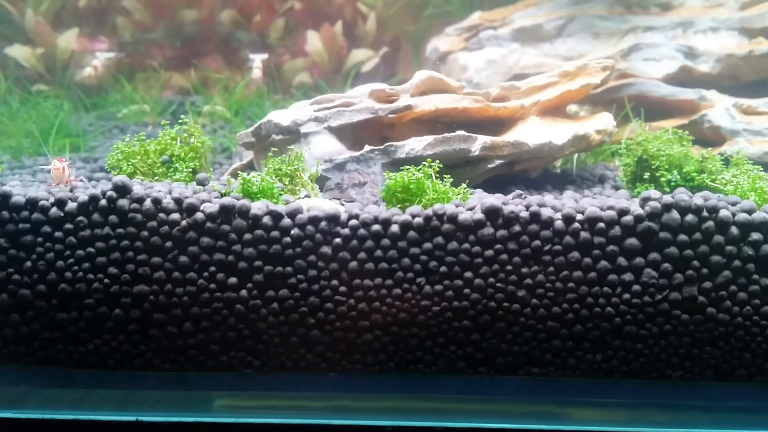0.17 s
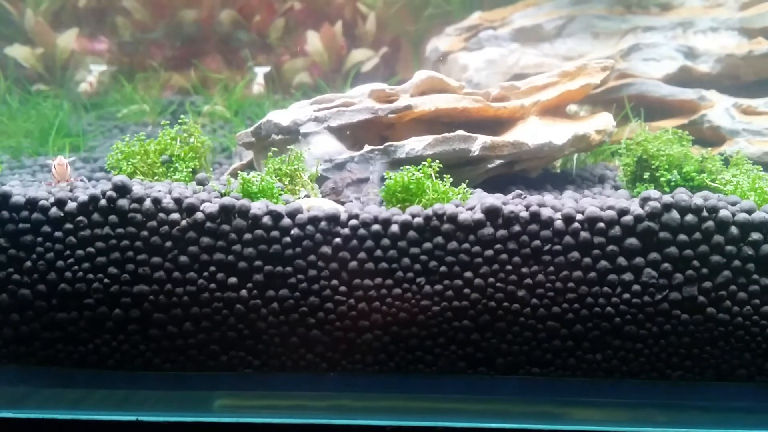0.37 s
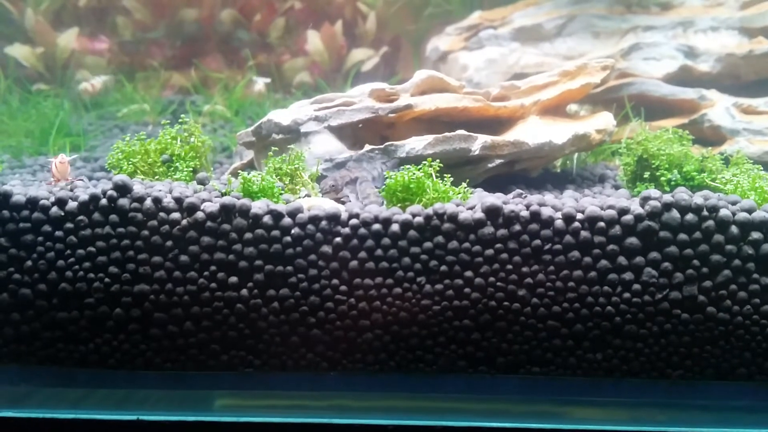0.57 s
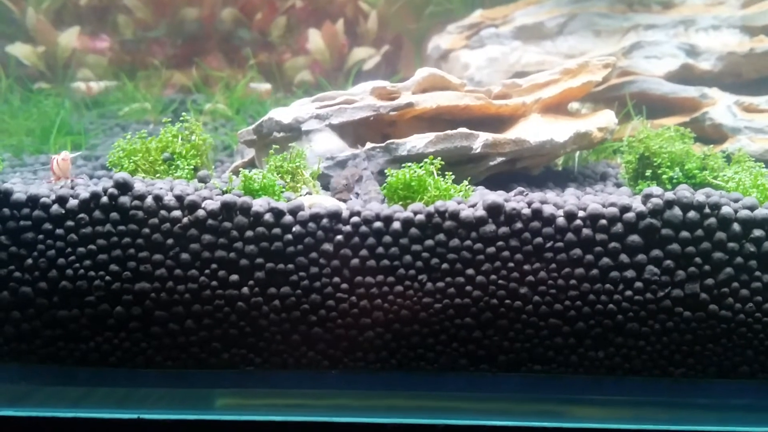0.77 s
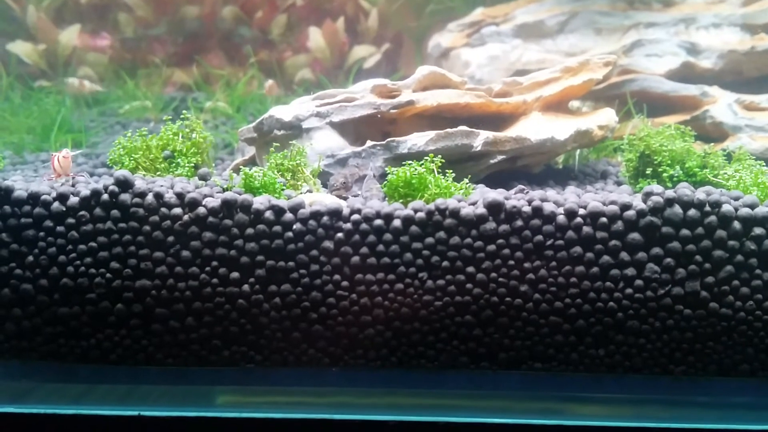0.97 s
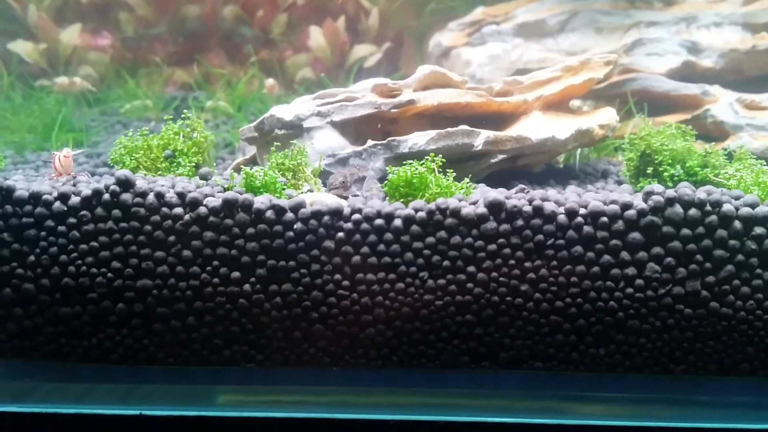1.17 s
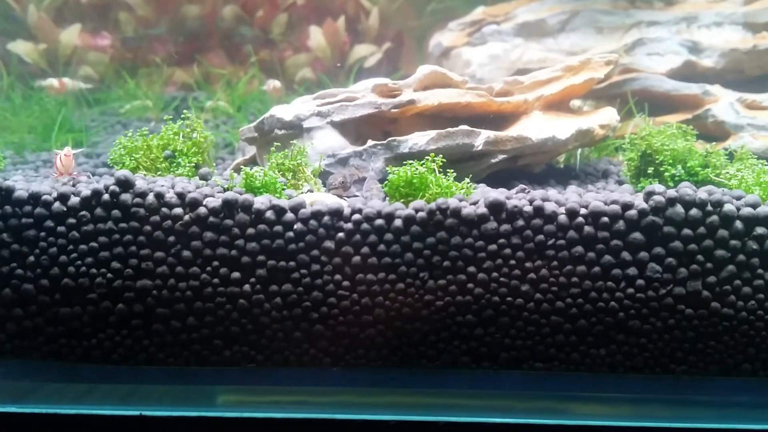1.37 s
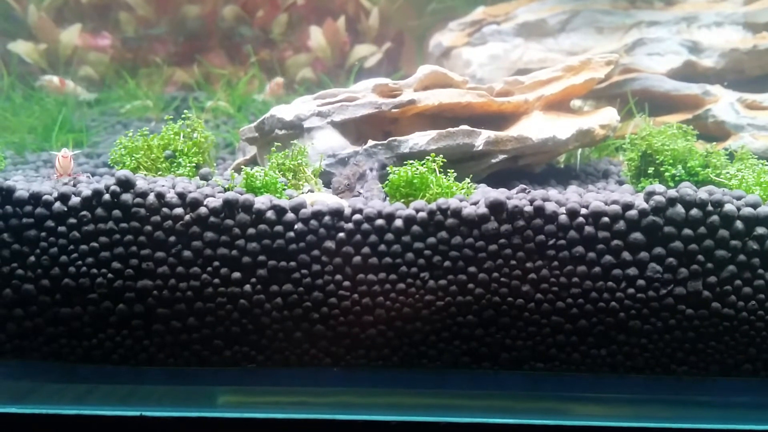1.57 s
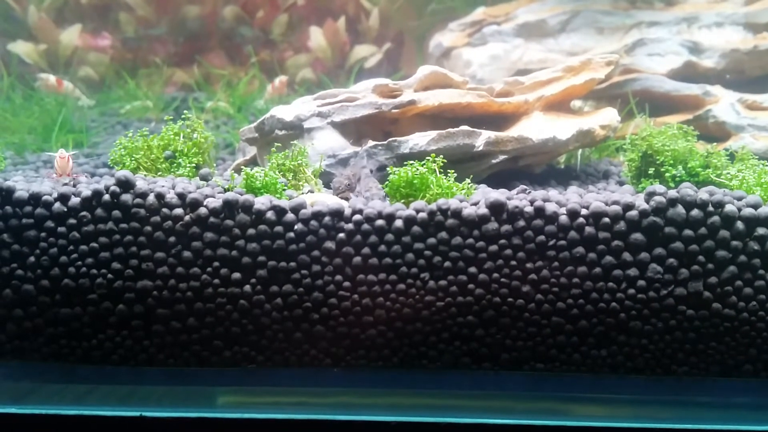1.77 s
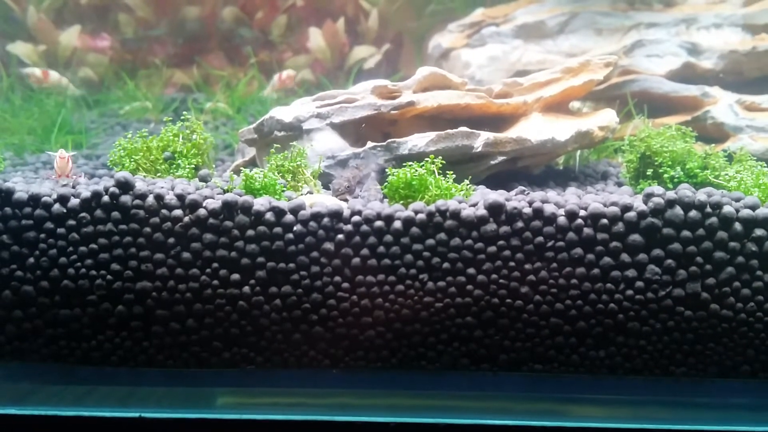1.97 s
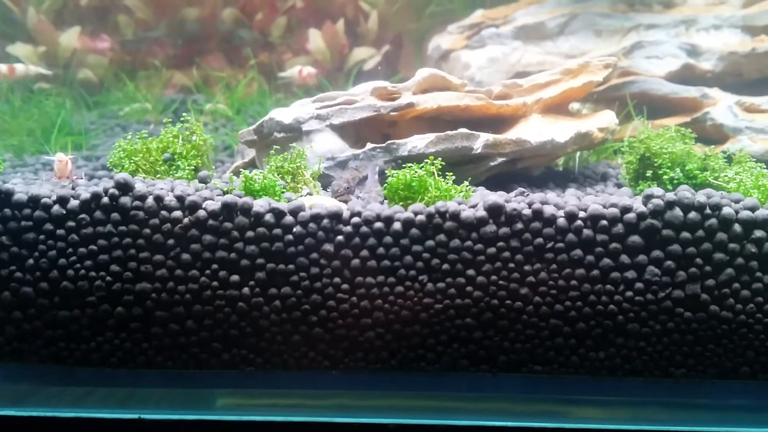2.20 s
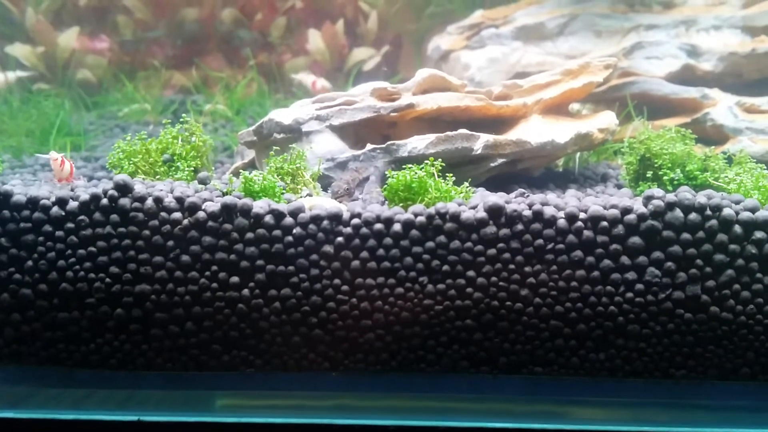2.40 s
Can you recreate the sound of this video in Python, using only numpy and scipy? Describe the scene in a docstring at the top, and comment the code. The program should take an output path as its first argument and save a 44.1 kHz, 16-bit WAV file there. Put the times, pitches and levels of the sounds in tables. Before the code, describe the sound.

An aquarium filter pump hums and buzzes steadily over low rumble and fine, airy hiss

```python
"""A planted aquarium in a quiet room, heard from close to the glass.
From the start the filter pump hums, whines and buzzes once a turn; its hum beats slowly with the mains hum,
first strongest at 0.1 s. A fan-like drone dips often in the first 1.3 s, steps down near 1.7 s, then holds.
These tones are sums of cosines; the low rumble and the fine hiss, stronger on the left, are shaped noise.
The noise sinks a little until 0.8 s, swells to its strongest near 1.7 s and quickly falls back."""
import sys
import numpy as np
from scipy import signal
from scipy.fft import rfft, irfft
from scipy.io import wavfile

SR = 44100
rng = np.random.default_rng(int(sys.argv[2]) if len(sys.argv) > 2 else 0)


def put_to_file(sound):
    """Save the sound as 16-bit audio at rate SR, in the file named by the first command-line argument."""
    columns = np.atleast_2d(sound).T  # one column per channel
    safe = np.clip(columns, -1, 1)
    whole_steps = np.round(safe * 32767)
    wavfile.write(sys.argv[1], SR, whole_steps.astype(np.int16))


N = 112014

PUMP_HZ, MAINS_HZ = 49.21, 49.91
BEAT_CREST_S = 0.1  # the second harmonics of pump and mains are in step here
EAR_SHARES = np.array([[0.5], [-0.5]])  # splits a difference evenly: left, right


def from_db(db):
    """Turn decibels into gain."""
    return 10 ** (np.asarray(db) / 20)


def seconds():
    """Give the time of every sample."""
    return np.arange(N) / SR


def in_time(rows):
    """Draw straight lines between the (time, value) rows of a table."""
    times, values = np.transpose(rows)
    return np.interp(seconds(), times, values)


def bin_hz():
    """Give the frequency of every spectral bin, kept just above zero."""
    return np.fft.rfftfreq(N, 1 / SR) + 1e-9


def per_bin(points):
    """Read a table over log frequency at every spectral bin."""
    hz, value = np.transpose(points)
    return np.interp(np.log(bin_hz()), np.log(hz), value)


def pan(db):
    """Give left and right gains that differ by this many dB (positive: left is louder)."""
    return from_db(EAR_SHARES * db)


def white():
    """Make separate white noise for each ear, 0 dB per Hz."""
    return rng.standard_normal((2, N)) * np.sqrt(SR / 2)


def colour(x, spectrum):
    """Give a signal a smooth spectral shape."""
    return irfft(rfft(x) * from_db(per_bin(spectrum)), N)


def resonate(x, hz, width_hz):
    """Pass a signal through a resonance whose gain is 1 at its centre."""
    f = bin_hz()
    detuning = (f * f - hz * hz) / (f * width_hz)
    return irfft(rfft(x) / (1 + 1j * detuning), N)


def drift(rate_hz):
    """Make slow random motion with mean 0 and spread 1, by damping noise above the rate."""
    damping = 1 + (np.fft.rfftfreq(N, 1 / SR) / rate_hz) ** 2
    slow = irfft(rfft(rng.standard_normal(N)) / damping, N)
    return (slow - slow.mean()) / slow.std()


def hum(base_hz, harmonics):
    """Add steady harmonics, each reaching the two ears with its own level and lag."""
    turn = 2 * np.pi * base_hz * (seconds() - BEAT_CREST_S)
    out = np.zeros((2, N))
    for k, (multiple, left_db, right_db, lead_rad) in enumerate(harmonics):
        # the first harmonic crests at the beat crest, the others start anywhere
        start = rng.uniform(0, 2 * np.pi) if k else 0
        phase = np.round(multiple) * turn + start + EAR_SHARES * lead_rad
        ear_gains = np.sqrt(2) * from_db([[left_db], [right_db]])
        out += ear_gains * np.cos(phase)
    return out


# harmonics of the pump's rotation:
# (multiple of the rotation, left level [dB], right level [dB], left leads by [rad])
PUMP_HARMONICS = [(2, -59.5, -59.5, 0.36), (4, -84, -80, 1.5), (5, -68.5, -66.5, 0), (6, -82.5, -75, 1.5),
                  (7, -80, -77.5, -.8), (8, -82.5, -74, 0), (14, -91, -100, -2.5), (15, -95, -100, -2.5),
                  (16, -101, -102, 0.5), (24, -94, -91, 2), (25, -91, -91, -2.1), (29, -102, -93, -3.5),
                  (30, -88.5, -81.5, 1.8), (31, -86.5, -88.5, -2.1), (32, -90, -96, 0),
                  (33, -92.5, -103, -2.5), (34, -99, -97, -3), (37, -89, -89, 2.5), (49, -90.5, -91, -0.5),
                  (50, -92, -92, 1.9), (55, -108, -86, 2.8), (73, -94, -92.5, 1.5)]


def pump_hum():
    """The turning pump hums at whole multiples of its rotation rate."""
    return hum(PUMP_HZ, PUMP_HARMONICS)


def pump_whine():
    """The pump's eleventh harmonic stands out and throbs once a turn."""
    level_db, left_lead_rad = -61, 0.79  # level before the throb
    turn = 2 * np.pi * PUMP_HZ * seconds()
    throb = 1 + 0.29 * np.cos(turn)
    tone = np.cos(11 * turn + EAR_SHARES * left_lead_rad)
    return np.sqrt(2) * from_db(level_db) * throb * tone


# resonances of the pump housing:
# (frequency [Hz], width [Hz], left level [dB per Hz], right level [dB per Hz])
HOUSING_RESONANCES = [(1500, 100, -115, -109), (2660, 8.4, -100, -90.5), (2720, 9.4, -108, -97),
                      (3630, 55, -108, -102), (3680, 11, -104, -99), (3714, 10, -102, -98.5),
                      (4210, 10, -102, -95.5), (4510, 90, -110, -105), (4752, 8.6, -97.5, -101),
                      (5690, 200, -107, -103), (6800, 270, -112, -109)]


def rotor_buzz():
    """The rotor's rubbing swells once a turn and rings in the pump housing."""
    swell = 1 + 0.79 * np.cos(2 * np.pi * PUMP_HZ * seconds())
    swell = swell / np.sqrt(np.mean(swell ** 2))  # keeps the average power
    out = np.zeros((2, N))
    for hz, width_hz, left_db, right_db in HOUSING_RESONANCES:
        rubbing = white() * swell
        out += from_db([[left_db], [right_db]]) * resonate(rubbing, hz, width_hz)
    return out


# harmonics of the mains hum:
# (multiple of the mains rate, left level [dB], right level [dB], left leads by [rad])
MAINS_HARMONICS = [(2, -66.5, -67, .3), (4, -72, -71.5, .2)]


def mains_hum():
    """The mains hums slightly above the pump's rate, so their second harmonics beat."""
    return hum(MAINS_HZ, MAINS_HARMONICS)


# level of the drone before its trim and pan: (time [s], level [dB])
DRONE_LEVEL_CURVE = [(0.0, -54.5), (0.03, -51.5), (0.31, -52), (0.34, -56), (0.46, -47.5), (0.52, -58),
                     (0.56, -51.5), (0.73, -57), (0.88, -49.5), (0.94, -57.5), (1.0, -49), (1.05, -55),
                     (1.16, -49), (1.22, -53.5), (1.71, -49), (1.75, -53.5), (2.46, -53.5), (2.54, -54)]


def drone():
    """One low tone, probably a fan, wavers in level and slightly in pitch."""
    drone_hz, trim_db, pan_db = 166.85, 0.07, -2.06
    wander_rad = 0.16 * drift(5.5)
    phase = 2 * np.pi * drone_hz * seconds() + wander_rad
    gain = np.sqrt(2) * from_db(in_time(DRONE_LEVEL_CURVE) + trim_db)
    return gain * np.sin(phase) * pan(pan_db)


# slow swell shared by rumble and hiss: (time [s], level [dB])
NOISE_SWELL = [(0, 0), (.12, 0.4), (.33, -0.15), (.8, -0.5), (1.3, 0.17), (1.68, 1.4), (1.85, -0.5),
               (2.54, -0.44)]


def noise_swell_db():
    """Rumble and hiss rise and fall together, following one slow curve."""
    return in_time(NOISE_SWELL)


# The next three tables shape the rumble, before its pan and swell.
# smooth spectrum of moving air and water: (frequency [Hz], level [dB per Hz])
FLOW_SPECTRUM = [(15, -108), (35, -105), (55, -96.5), (115, -92), (250, -88), (340, -92.5), (480, -93.5),
                 (600, -99), (800, -103), (1200, -110), (2500, -121), (6000, -135)]
# resonances of tank and cabinet: (frequency [Hz], width [Hz], level [dB per Hz])
CABINET_RESONANCES = [(69, 3, -86.5), (127.1, 7.8, -81), (160.4, 7.1, -75.5), (178.3, 8, -84.5),
                      (221.2, 10, -83.5), (243.5, 12, -86), (272.6, 11.6, -80.5), (315.3, 12, -90.5),
                      (384, 20, -95), (441.4, 15, -92), (543, 26.5, -90), (635, 14, -98)]
# how alike the two ears are: (frequency [Hz], likeness [0 unrelated to 1 identical])
EAR_LIKENESS = [(25, 0.35), (70, 0.85), (170, 1), (280, 0.89), (400, 0.68), (650, 0.46), (1200, 0.05)]


def rumble():
    """Turbulence is coloured by tank and cabinet, and most alike in both ears near 170 Hz."""
    pan_db, swell_share = -2, 1.1
    flow = colour(white(), FLOW_SPECTRUM)
    for hz, width_hz, level_db in CABINET_RESONANCES:
        flow = flow + from_db(level_db) * resonate(white(), hz, width_hz)
    # a shared middle and an opposed side, mixed so that the power stays the same
    alike = per_bin(EAR_LIKENESS)
    shares = np.sqrt([(1 + alike) / 2, (1 - alike) / 2])
    mid, side = irfft(rfft(flow) * shares, N)
    ears = np.array([mid + side, mid - side])
    return ears * pan(pan_db) * from_db(swell_share * noise_swell_db())


# hiss in the left ear, before swell and flicker: (frequency [Hz], level [dB per Hz])
LEFT_HISS_SPECTRUM = [(200, -112), (1000, -108), (1700, -107), (3000, -108.5), (4200, -105.5),
                      (5200, -103.5), (6200, -97), (6950, -91.5), (7900, -98), (8500, -98), (9500, -103),
                      (10700, -107), (11600, -110.5), (14500, -110)]
# hiss in the right ear, before swell and flicker: (frequency [Hz], level [dB per Hz])
RIGHT_HISS_SPECTRUM = [(200, -112), (1000, -107), (1700, -107), (3000, -109), (4200, -108), (5200, -109.5),
                       (6200, -108.5), (8000, -109.5), (8500, -108.5), (9300, -112), (11600, -111.5),
                       (14500, -111)]


def hiss():
    """Smooth noise, unrelated in the two ears, flickers slightly and peaks near 7 kHz on the left."""
    left, right = white()
    flicker_db = 0.42 * drift(16)
    ears = np.array([colour(left, LEFT_HISS_SPECTRUM), colour(right, RIGHT_HISS_SPECTRUM)])
    return from_db(noise_swell_db() + flicker_db) * ears


def scene():
    """All the sources sound together from start to end."""
    pump = pump_hum() + pump_whine() + rotor_buzz()
    background = mains_hum() + drone() + rumble() + hiss()
    return pump + background


def record(dry):
    """A steep low-pass filter removes the sound above 14450 Hz."""
    low_pass = signal.ellip(12, 0.1, 70, 14450, fs=SR, output="sos")
    return signal.sosfilt(low_pass, dry)


dry = scene()
out = record(dry)
put_to_file(out)
```